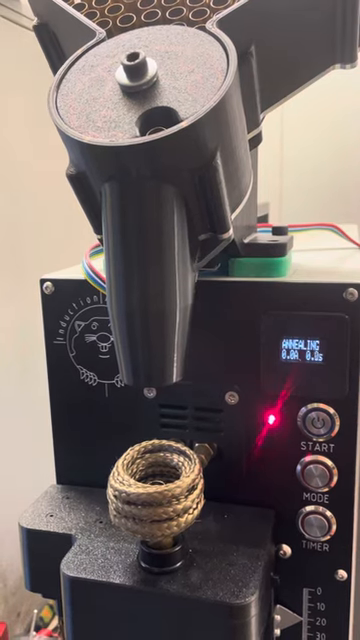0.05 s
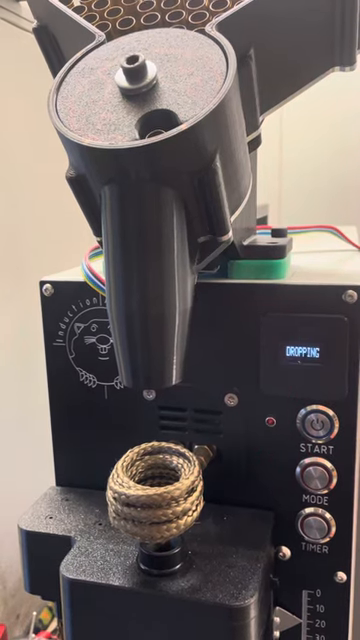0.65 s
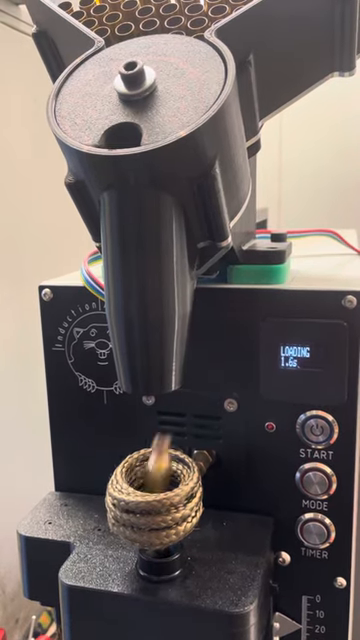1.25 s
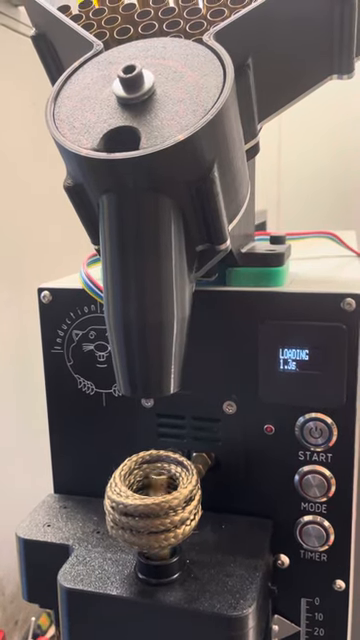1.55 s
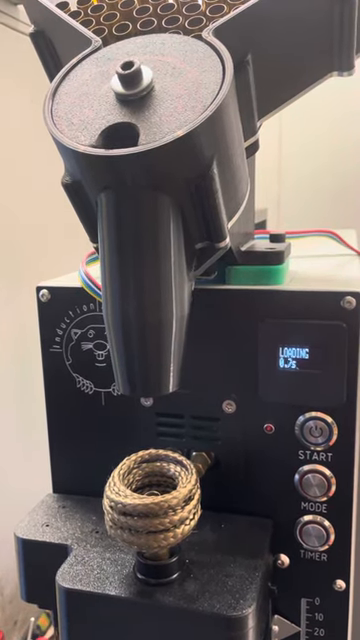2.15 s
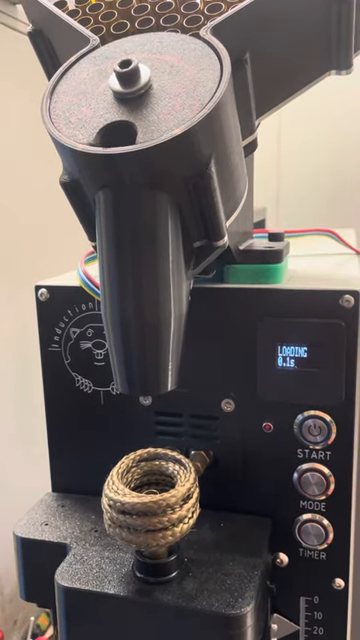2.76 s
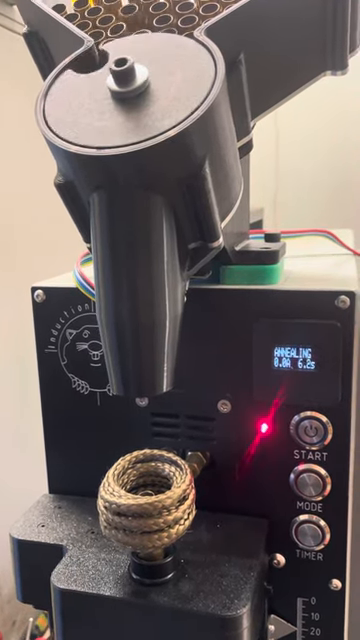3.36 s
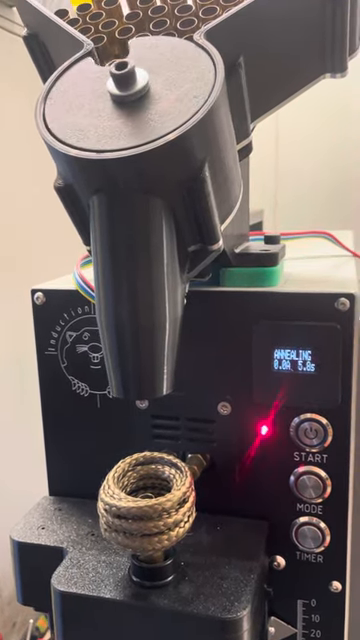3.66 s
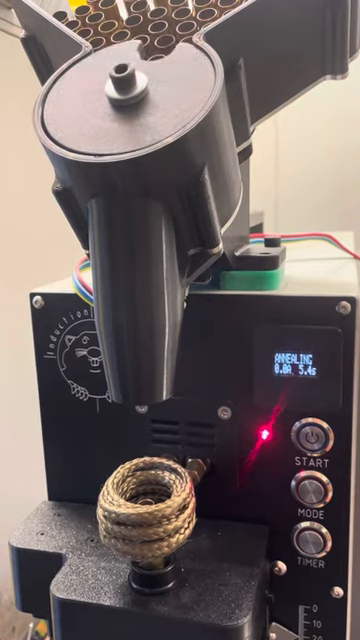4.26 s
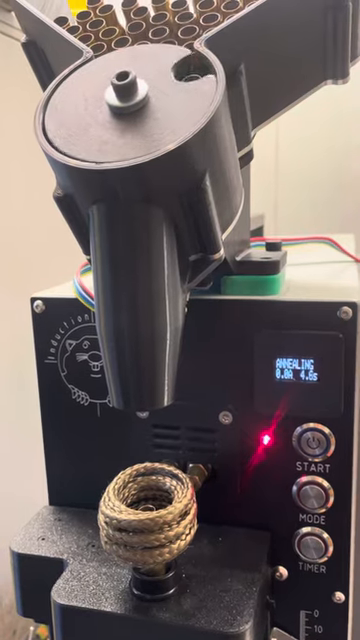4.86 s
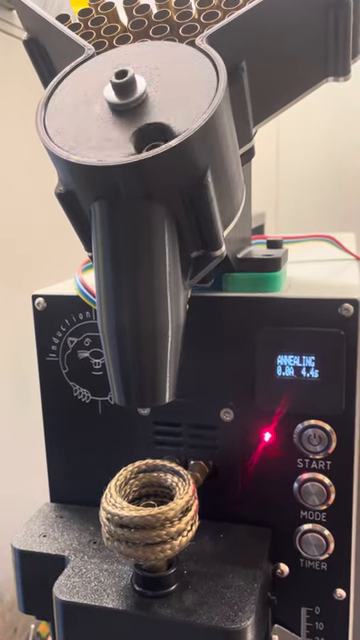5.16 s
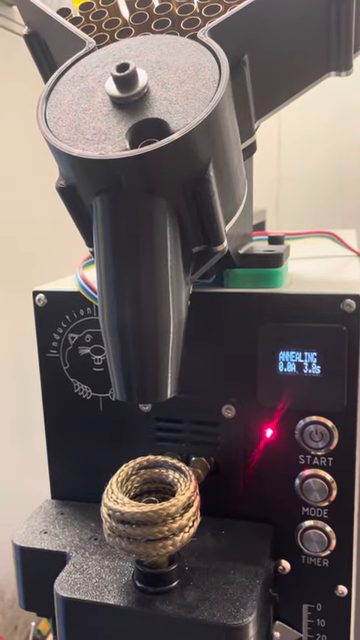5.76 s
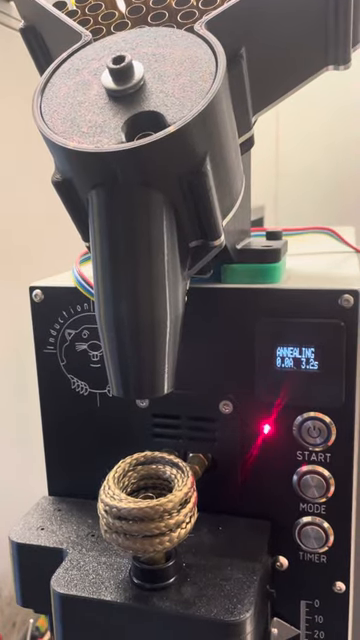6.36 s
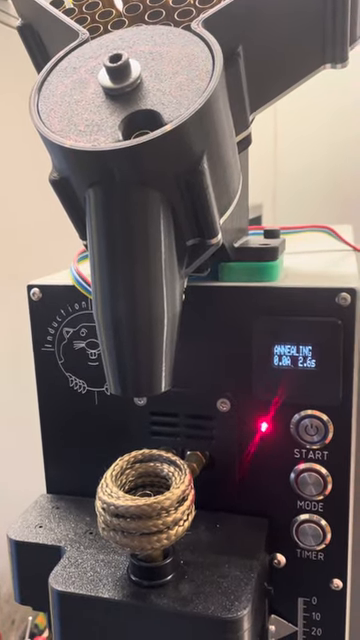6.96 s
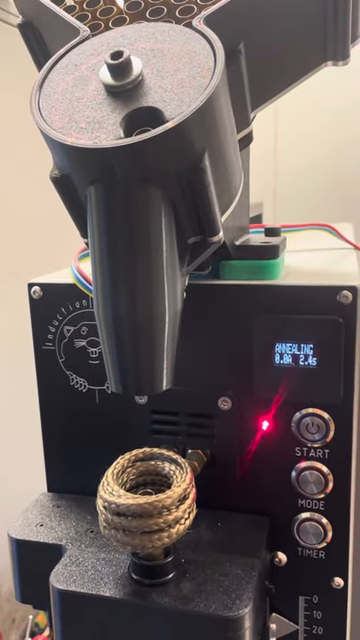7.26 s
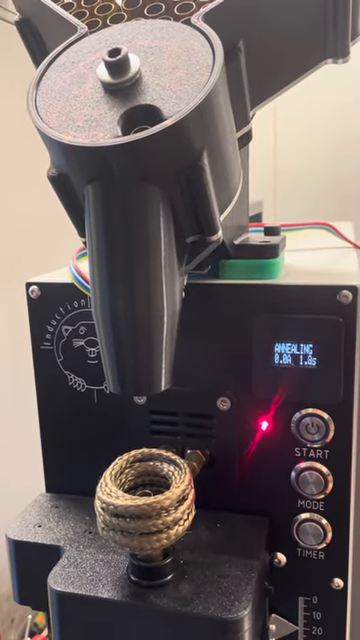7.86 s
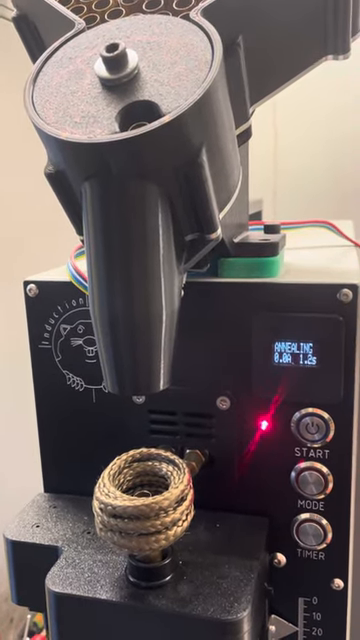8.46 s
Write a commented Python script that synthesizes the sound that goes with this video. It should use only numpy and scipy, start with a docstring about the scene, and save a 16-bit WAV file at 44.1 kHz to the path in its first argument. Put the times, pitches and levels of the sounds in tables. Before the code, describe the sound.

Two cooling fans hum and rush throughout, close by in a small workshop. At 0.15 seconds a small machine's trapdoor snaps open. A brass case rings off a chute at 0.35, knocks into the base at 0.4 and rebounds. The door claps shut with a rattle at 0.8, leaving a faint metallic ring. The next case rattles down a plastic tube at 1.0 and lands with a sharp click at 1.3, with a small tap at 1.75. Meanwhile one fan sags in pitch, then spins up from about 3.1. From 3.0 to 5.2 a motor gives a thin, high whine while a plastic feed disc rubs softly. Waiting cases clink brightly around 3.4, dry ticks cluster near 3.7, and lighter ticks patter around 5. After that only the steady fan hum continues until the end, at about 8.6 seconds.

```python
"""Two cooling fans hum in a small benchtop annealer as it swaps a brass cartridge case.
The trapdoor snaps open, the hot case rings off the chute and knocks into the base, the door claps
shut and the next case rattles down a plastic tube onto it. A whining stepper then turns the feed
disc, which rubs, ticks and jostles the cases in the hopper. Each contact is a noise crack plus
decaying modes. One fan sags while the heater is off and spins up again."""
import sys
import numpy as np
from scipy import signal
from scipy.fft import rfft, irfft, next_fast_len
from scipy.io import wavfile

SR = 44100
rng = np.random.default_rng(int(sys.argv[2]) if len(sys.argv) > 2 else 0)


def put_to_file(sound):
    """Save the sound as 16-bit audio at rate SR, in the file named by the first command-line argument."""
    columns = np.atleast_2d(sound).T  # one column per channel
    safe = np.clip(columns, -1, 1)
    whole_steps = np.round(safe * 32767)
    wavfile.write(sys.argv[1], SR, whole_steps.astype(np.int16))


N = 375291
TIME = np.arange(N) / SR
FFT_SIZE = 2 * next_fast_len(N // 2 + 1, True)
HZ = np.maximum(np.fft.rfftfreq(FFT_SIZE, 1 / SR), 1)
HEATER_OFF_S, HEATER_ON_S = 0.1, 3.07

# Crack spectrum, opening trapdoor and chute: freq_hz, level_db
SNAP_SPECTRUM = [(200, 3), (600, 3), (1100, 0.5), (2000, -3.5), (3300, -6), (5300, -4), (8500, -5.5),
                 (10500, -8), (12500, -59), (14500, -19)]
# Crack spectrum, base and closing trapdoor: freq_hz, level_db
KNOCK_SPECTRUM = [(200, -25), (450, -16.5), (830, 6.5), (1150, -1.5), (2000, -13.5), (3300, -5),
                  (5300, -4.5), (8500, -3), (10500, -9.5), (12500, -46), (14500, -32)]
# Closing trapdoor's contacts: start_s, level_db, low_modes_db
CLOSING_HITS = [(.8011, -8.5, -0.5), (.8138, -7.5, -15), (.8203, -12.5, -7), (.826, -15, -5),
                (.8325, -10.5, -14), (.883, -27, 1), (.9223, -19, -11), (.9655, -33, 6)]
# Stepper moves, fast, slow, fast: start_s, end_s, whine_db, whistle_db, rubbing_db
STEPPER_MOVES = [(3.007, 3.378, -59, -57, -53), (3.347, 4.887, -69, -61.5, -55),
                 (4.866, 5.235, -64, -55, -50)]


def from_db(db):
    """Decibels to gain."""
    return 10 ** (np.asarray(db) / 20)


def unit_rms(x):
    """Scale to unit rms."""
    return x / np.sqrt(np.mean(x ** 2) + 1e-20)


def add(track, start, sound):
    """Mix a sound in at a start sample."""
    track[start:start + len(sound)] += sound[:N - start]


def held(start_s, end_s, attack_s, release_s):
    """Trapezoid envelope, back at 0 by end_s."""
    return np.clip(np.minimum((TIME - start_s) / attack_s, (end_s - TIME) / release_s), 0, 1)


def at_hz(rows, hz):
    """Table columns interpolated over log frequency."""
    points_hz, *columns = np.transpose(rows)
    return [np.interp(np.log(hz), np.log(points_hz), column) for column in columns]


def noise(gain):
    """Noise with a given gain per frequency."""
    return irfft(rfft(rng.standard_normal(FFT_SIZE)) * gain)[:N]


def coloured(x, spectrum, size=512):
    """Unit-energy minimum-phase filter with the given spectrum."""
    db, = at_hz(spectrum, np.maximum(np.fft.rfftfreq(size, 1 / SR), 1))
    cepstrum = irfft(np.log(from_db(db)))
    cepstrum[1:size // 2] *= 2
    cepstrum[size // 2 + 1:] = 0
    response = irfft(np.exp(rfft(cepstrum)))
    return signal.oaconvolve(x, response / np.linalg.norm(response))[:N]


def wavering_tone(cycles, waver_db=4.0, waver_hz=8, wander_rad=0.52):
    """Sine with randomly drifting level and phase."""
    level, phase = [unit_rms(noise(np.exp(-HZ / waver_hz))) for _ in range(2)]
    return np.sqrt(2) * from_db(waver_db * level) * np.sin(2 * np.pi * cycles + wander_rad * phase)


def ring(hz, t60_s, build_cycles=0.39):
    """One mode: fast build-up, exponential decay."""
    age_s = np.arange(int(t60_s * SR)) / SR
    onset = 1 - np.exp(-age_s * hz / build_cycles)
    return np.sin(2 * np.pi * hz * age_s) * from_db(-60 * age_s / t60_s) * onset


def struck(hits, modes, spectrum, crack_db, crack_t60_s, crack_room_db, ring_room_db,
           detune=0.0, low_below_hz=1900, scatter_db=0.0, attack_s=0.00057):
    """Each contact cracks and rings the part's modes. Returns [direct, room send]."""
    age_s = np.arange(4000) / SR
    envelope = (1 - np.exp(-age_s / attack_s)) * from_db(crack_db - 60 * age_s / crack_t60_s)
    cracks, rings = np.zeros(N), np.zeros(N)
    for start_s, level_db, low_modes_db in hits:
        start = round(start_s * SR)
        add(cracks, start, from_db(level_db) * envelope * rng.standard_normal(len(age_s)))
        for hz, mode_db, t60_s in modes:
            louder, higher = rng.standard_normal(2)  # contact point varies
            gain = from_db(level_db + mode_db + scatter_db * louder + low_modes_db * (hz < low_below_hz))
            add(rings, start, gain * ring(hz * (1 + detune * higher), t60_s))
    cracks = coloured(cracks, spectrum)
    return np.array([cracks + rings, from_db(crack_room_db) * cracks + from_db(ring_room_db) * rings])


def settling(hits, loss_db, duller_db, lag_s=0.0036):
    """Each blow lands on an edge, then flat with its low modes reweighted."""
    contacts = []
    for start_s, level_db, low_modes_db in hits:
        contacts.append((start_s, level_db, low_modes_db))
        contacts.append((start_s + lag_s, level_db - loss_db, low_modes_db + duller_db))
    return contacts


def rattle(start_s, end_s, count, level_db, edge_drop_db, low_modes_db, spread_db=4.5):
    """Unevenly spaced contacts that swell and fade."""
    places = (np.arange(count) + rng.random(count)) / count
    levels_db = level_db - edge_drop_db * (2 * places - 1) ** 2 + spread_db * rng.standard_normal(count)
    return [(start_s + place * (end_s - start_s), db, low_modes_db)
            for place, db in zip(places, levels_db)]


def idleness(lag_s=0.42):
    """Fan state lagging the heater: 0 at full speed, 1 at idle."""
    since_off, since_on = [np.maximum(TIME - s, 0) for s in (HEATER_OFF_S, HEATER_ON_S)]
    return np.exp(-since_on / lag_s) - np.exp(-since_off / lag_s)


def fan_air(ripple_db=3.0, echo_s=0.0048, dip_db=-25, dip_below_hz=520, idle_db=-1.87):
    """Rushing air with narrow hums, softer at idle; the bass dips briefly."""
    # Air rush: freq_hz, density_db_per_hz
    rush = [(22, -93), (42, -67.5), (100, -75), (135, -74.5), (175, -59.5), (310, -67), (420, -73.5),
            (600, -68.5), (780, -71.5), (1100, -80.5), (1600, -80.5), (2400, -89), (6000, -96), (9300, -96),
            (11000, -109), (12500, -134)]
    # Fan and cabinet hums: pitch_hz, width_hz, level_db
    hums = [(54.1, 10, -41.5), (158.1, 3.1, -48.5), (203.8, 6.5, -41), (229.4, 6.9, -41.5),
            (269, 18, -48.5), (359, 9, -58.5), (405.5, 10, -55), (467.2, 8.5, -51), (526, 41, -49.5),
            (658, 35, -47.5), (1012, 45, -51.5), (1158, 25, -58), (1436.4, 32, -53.5), (2070, 130, -81),
            (2930, 77, -64.5), (5700, 370, -62)]
    rush_db, = at_hz(rush, HZ)
    # Bench and wall reflections ripple the spectrum
    reflections = rng.standard_normal(N) * np.exp(-TIME / echo_s)
    ripple = unit_rms(rfft(reflections, FFT_SIZE).real)
    power = from_db(rush_db + ripple_db * ripple * (HZ > 300)) ** 2
    for hz, width_hz, db in hums:
        power += from_db(db) ** 2 * 2 / (np.pi * width_hz) / (1 + ((HZ - hz) / width_hz) ** 2) ** 2
    gain = np.sqrt(power * SR / 2)
    bass_share = 1 / (1 + (HZ / dip_below_hz) ** 4)
    dip = held(0.415, 0.749, attack_s=0.03, release_s=0.21)
    bass = noise(gain * np.sqrt(bass_share)) * from_db(dip_db * dip)
    treble = noise(gain * np.sqrt(1 - bass_share))
    return (bass + treble) * from_db(idle_db * idleness())


def gliding_fan(full_turns_per_s=130, idle_turns_per_s=113.6, spin_up_s=2.2):
    """Seven-bladed fan: coasts down with the heater off, sings louder as it spins up."""
    orders = (1, 7, 14, 16)  # multiples of the turning rate
    levels_db = (-60, -53.5, -71.5, -73.5)
    spin_up_boosts_db, idle_drops_db = (0, 5, 9.5, 0), (-2, 0, 12, 9)
    idle = idleness()
    effort = held(HEATER_ON_S, HEATER_ON_S + spin_up_s, attack_s=0.15, release_s=0.6)
    turns = np.cumsum(full_turns_per_s + (idle_turns_per_s - full_turns_per_s) * idle) / SR
    return sum(from_db(db + boost_db * effort - drop_db * idle) * wavering_tone(order * turns)
               for order, db, boost_db, drop_db in zip(orders, levels_db, spin_up_boosts_db, idle_drops_db))


def steady_fan(blade_hz=858, level_db=-48.3):
    """Blade tone of the constant-speed fan."""
    return from_db(level_db) * wavering_tone(blade_hz * TIME, waver_db=0.5, wander_rad=0.31)


def trapdoor_opening():
    """The trapdoor snaps open with a short, bright ring."""
    # Contacts: start_s, level_db, low_modes_db
    hits = [(.1265, -34, 2), (.153, -23, -7), (.1568, -5.5, -9.5)]
    # Trapdoor modes: pitch_hz, level_db, t60_s
    modes = [(634, -24, 0.04), (1210, -13, 0.033), (1730, -15, 0.016), (2760, -10.5, 0.026),
             (3600, -0.5, 0.015), (4820, -13, 0.016), (5180, -8, 0.017), (8350, -6.5, 0.015),
             (8770, -3.5, 0.012)]
    return struck(settling(hits, loss_db=10, duller_db=20.5), modes, SNAP_SPECTRUM, detune=0.022,
                  crack_db=-11.5, crack_t60_s=0.041, crack_room_db=-1.5, ring_room_db=-12)


def case_on_chute():
    """The hot case rings as it bounces off the chute."""
    # Bounces: start_s, level_db, low_modes_db
    hits = [(.3432, -15, 8.2), (.3605, -15, 1), (.374, -22, 7.1), (.388, -24, 7.8)]
    # Brass case modes: pitch_hz, level_db, t60_s
    modes = [(1104, -11, 0.032), (2187, -15, 0.04), (2254, -15, 0.05), (4158, -9, 0.12), (4200, -17, .09),
             (5898, -5, 0.13), (5949, -19, .07), (8550, -18, 0.036), (12160, -42, 0.11), (14200, -32, .08)]
    chatter = rattle(0.348, 0.402, count=6, level_db=-24.5, edge_drop_db=3, low_modes_db=4)
    return struck(hits + chatter, modes, SNAP_SPECTRUM, low_below_hz=2600,
                  crack_db=-6, crack_t60_s=0.045, crack_room_db=-4, ring_room_db=-19)


def case_on_base():
    """The case knocks into the base and rebounds."""
    # Knocks: start_s, level_db, low_modes_db
    hits = [(.4098, -7.5, -6.5), (.5275, -24.5, -21), (.5587, -13, -19), (.568, -22.5, -9), (.578, -21, -9)]
    # Base modes: pitch_hz, level_db, t60_s
    modes = [(605, -11, 0.022), (730, -13, 0.017), (860, 1.5, 0.023), (920, -13, 0.021), (1050, -24, 0.026),
             (1560, -26, 0.053), (2964, -12, 0.034), (5200, -22, 0.055), (5500, -3, 0.012),
             (9900, -13, 0.057)]
    return struck(settling(hits, loss_db=11, duller_db=19.5), modes, KNOCK_SPECTRUM,
                  crack_db=-2, crack_t60_s=0.028, crack_room_db=-1.5, ring_room_db=-8)


def trapdoor_closing():
    """The trapdoor claps shut and rattles."""
    # Trapdoor modes: pitch_hz, level_db, t60_s
    modes = [(626, -30, 0.025), (780, -5.5, 0.025), (856, -4, 0.03), (1053, -9, 0.031), (1410, -10, 0.026),
             (2730, -22.5, 0.086), (3460, -20, 0.051), (4900, -19, 0.021), (5420, -9.5, 0.019)]
    claps = settling(CLOSING_HITS, loss_db=13, duller_db=16.5)
    chatter = rattle(0.804, 0.846, count=7, level_db=-22, edge_drop_db=6, low_modes_db=-8)
    return struck(claps + chatter, modes, KNOCK_SPECTRUM, detune=0.031,
                  crack_db=-3.5, crack_t60_s=0.044, crack_room_db=-6, ring_room_db=-5)


def trapdoor_after_ring():
    """Faint metal overtones outlast the door's first clap."""
    # Overtones: pitch_hz, level_db, t60_s
    modes = [(2713, -42, .3), (3164, -37, 1.2), (3257, -39, .25), (3395, -38, .5), (4134, -42, .45),
             (5351, -35, .35)]
    clap_s = CLOSING_HITS[0][0]
    track = np.zeros(N)
    for hz, db, t60_s in modes:
        add(track, round(clap_s * SR), from_db(db) * ring(hz, t60_s, build_cycles=1))
    return track


def case_in_tube():
    """The next case rattles down the plastic tube."""
    # Contacts: start_s, level_db, low_modes_db
    hits = [(1.0037, -14, -14), (1.0205, -16.5, -15), (1.0296, -6.5, 3.5), (1.0372, -7.5, 6),
            (1.0545, -13, -16), (1.0665, -16, -3)]
    # Tube modes: pitch_hz, level_db, t60_s
    modes = [(146.7, -36, 0.7), (1254, -9.5, 0.024), (1360, -8, 0.035), (1505, -20, 0.1), (2570, -21, .025),
             (3360, -24, 0.018), (4380, -19, 0.075), (5700, -13, 0.037), (8500, -22, .04),
             (10100, -31, 0.26), (14600, -41, 0.34)]
    # Crack: freq_hz, level_db
    spectrum = [(200, -23), (600, -13), (1100, -5), (2000, -10), (3300, -9), (5300, -12), (8500, -3.5),
                (10500, -13), (12500, -39), (14500, -39)]
    knocks = settling(hits, loss_db=19, duller_db=-10)
    chatter = rattle(1.038, 1.082, count=7, level_db=-25, edge_drop_db=4, low_modes_db=-4)
    return struck(knocks + chatter, modes, spectrum, detune=0.0061,
                  crack_db=1.5, crack_t60_s=0.014, crack_room_db=-10, ring_room_db=-9)


def case_on_trapdoor():
    """The new case lands on the shut trapdoor."""
    # Contacts: start_s, level_db, low_modes_db
    hits = [(1.2908, -2.5, -4), (1.362, -27, -4), (1.369, -21.5, 3), (1.7505, -27.5, 13)]
    # Landing modes: pitch_hz, level_db, t60_s
    modes = [(625, -14, 0.034), (1060, -5.5, 0.014), (1860, -15, 0.015), (2060, -26, .02),
             (3700, -8, 0.018), (4430, -24, 0.022), (5330, -13, 0.018), (5570, -11, 0.029),
             (9560, -30, 0.018)]
    # Crack: freq_hz, level_db
    spectrum = [(200, -17), (600, 0), (1100, -15), (2500, -7.5), (4400, 2), (5400, 0.5), (7000, 2.5),
                (7600, -7), (9600, 4), (10800, -18), (12500, -57), (14500, -25)]
    return struck(settling(hits, loss_db=15.5, duller_db=10), modes, spectrum, detune=0.014,
                  crack_db=-2.5, crack_t60_s=0.017, crack_room_db=-6, ring_room_db=-8)


def stepper_whine(pitch_hz=2000.5, fade_s=0.053):
    """Unsteady motor tone an octave under the drive's whistle, loudest in the fast moves."""
    level = sum(from_db(db) * held(start_s, end_s, fade_s, fade_s)
                for start_s, end_s, db, _, _ in STEPPER_MOVES)
    return level * wavering_tone(pitch_hz * TIME, waver_db=3, waver_hz=40, wander_rad=0.5)


def drive_whistle(pitch_hz=4001, left_lead_rad=-2.7, balance_db=-3.5, fade_s=0.029):
    """Thin tone of the stepper drive during each move, left and right nearly in antiphase."""
    tone = np.sqrt(2) * np.sin(2 * np.pi * pitch_hz * TIME + np.array([[left_lead_rad], [0]]))
    level = sum(from_db(db) * held(start_s, end_s, fade_s, fade_s)
                for start_s, end_s, _, db, _ in STEPPER_MOVES)
    return tone * level * from_db([[balance_db / 2], [-balance_db / 2]])


def disc_rubbing(slips_per_s=500, spread_db=3.5, fade_s=0.04):
    """Tiny slips of the moving printed disc against its housing."""
    # Friction: freq_hz, level_db
    spectrum = [(500, -7), (1250, 1), (1700, -11), (2400, -32), (3150, -3.5), (3800, -11), (5200, -15.5),
                (9000, -10.5), (12500, -31)]
    slips = (rng.random(N) < slips_per_s / SR) * rng.choice([-1, 1], N)
    strength = from_db(-spread_db * np.clip(rng.standard_normal(N), -2, 2))
    pressure = sum(from_db(db) * held(start_s, end_s, fade_s, fade_s)
                   for start_s, end_s, _, _, db in STEPPER_MOVES)
    return unit_rms(coloured(slips * strength, spectrum)) * pressure


def disc_ticks():
    """The feed disc touches at a new spot each time, scattering pitch and strength."""
    # Contacts: start_s, level_db, low_modes_db
    hits = [(3.1031, -32, -1), (3.655, -29, 11.5), (3.6675, -21, 0), (3.689, -31, 8), (3.7761, -31, 8.5),
            (4.029, -27.5, 2), (4.1233, -29, -3), (4.973, -29.5, 8), (5.0058, -28, -6), (5.0265, -33, -4),
            (5.038, -36, 0), (5.0675, -33.5, 9), (5.095, -32, 7), (5.131, -32, 3), (5.156, -35, -2),
            (5.2283, -24.5, -1)]
    # Disc modes: pitch_hz, level_db, t60_s
    modes = [(1400, -5.5, 0.011), (1850, -13, 0.015), (3174, -8.5, 0.021), (4900, -10, 0.009),
             (6040, -8, 0.0059), (9000, -16, 0.012)]
    # Crack: freq_hz, level_db
    spectrum = [(200, -10), (600, 3), (1500, -21), (3000, -23), (5300, -1), (9500, -11), (12000, -55),
                (14500, -34)]
    scuff = rattle(3.572, 3.612, count=6, level_db=-41, edge_drop_db=3, low_modes_db=13)
    ticks = rattle(4.9, 5.18, count=16, level_db=-36, edge_drop_db=4, low_modes_db=7)
    return struck(hits + scuff + ticks, modes, spectrum, detune=0.055, scatter_db=3,
                  crack_db=-5.5, crack_t60_s=0.012, crack_room_db=-29, ring_room_db=-3)


def cases_in_hopper():
    """Waiting cases clink as the disc jostles them."""
    # Clinks: start_s, level_db, low_modes_db
    hits = [(3.339, -42, -10), (3.3525, -29, -6), (3.3695, -24, 4), (3.375, -19.5, -3), (3.3825, -23, -3),
            (3.3895, -25, 0), (3.3935, -18, -10), (3.4065, -22, 2), (3.412, -19, 2), (3.4195, -29, 2),
            (3.437, -36, -5), (3.7761, -42, -2), (3.8888, -32, -10), (4.029, -43, 6), (4.1233, -43, 2)]
    # Modes of the cases: pitch_hz, level_db, t60_s
    modes = [(1250, -15, 0.047), (1570, -10.5, 0.026), (1780, -31, 0.017), (9620, -26, 0.09),
             (9850, -15, 0.22), (9950, 0, 0.12), (10160, -20, 0.17), (12900, -12, 0.07), (14750, -18, .07),
             (15000, -7, 0.062)]
    # Crack: freq_hz, level_db
    spectrum = [(200, -35), (600, 1), (1500, 1), (2200, -3.5), (3200, 1), (5300, -2.5), (7600, -2.5),
                (9000, 3), (11500, -36), (14000, -9)]
    jostle = rattle(3.364, 3.44, count=6, level_db=-28.5, edge_drop_db=5, low_modes_db=2)
    return struck(hits + jostle, modes, spectrum, detune=0.00325,
                  crack_db=-4, crack_t60_s=0.048, crack_room_db=-9, ring_room_db=-17)


def case_on_rim():
    """A case catches on the rim of the disc's hole: dry, tight ticks."""
    # Catches: start_s, level_db, low_modes_db
    hits = [(3.3528, -15, -11), (3.6399, -17.5, 3), (3.6525, -20, 0), (3.663, -19.5, -15),
            (3.6735, -23, -6), (3.6855, -21, -17), (3.713, -41, 8), (3.8888, -40.5, 10), (4.106, -33, 8.5),
            (4.937, -32.5, 0), (4.961, -38, -6), (4.975, -43, 10)]
    # Rim modes: pitch_hz, level_db, t60_s
    modes = [(3050, -7, 0.012), (3230, -2.5, 0.015), (4700, -14, .01), (9200, -9.5, 0.0067)]
    # Crack: freq_hz, level_db
    spectrum = [(200, 0), (1500, -14), (3200, -16), (3800, -26), (4800, -5), (7600, 1), (9000, 2),
                (11000, -15), (12500, -43), (14500, -24)]
    return struck(hits, modes, spectrum, detune=0.021, low_below_hz=4000,
                  crack_db=-4.5, crack_t60_s=0.011, crack_room_db=-4, ring_room_db=-11)


def room(x, t60_s=0.26, band_hz=(500, 9000), build_s=0.0033):
    """One diffuse tail of the small workshop."""
    age_s = np.arange(22000) / SR
    envelope = from_db(-60 * age_s / t60_s) * (1 - np.exp(-age_s / build_s))
    tail = rng.standard_normal(len(age_s)) * envelope
    bandpass = signal.butter(1, band_hz, "band", fs=SR, output="sos")
    return signal.oaconvolve(x, signal.sosfilt(bandpass, tail / np.linalg.norm(tail)))[:N]


def microphone(direct, diffuse, other_diffuse):
    """Two ports: direct sound differs in phase and level, diffuse sound is only partly shared."""
    # Left port against right: freq_hz, lead_rad, balance_db, diffuse_coherence
    ports = [(60, 0, -.4, .99), (200, -.3, -1.4, .99), (300, -.35, -2, .92), (420, -1.1, -3, .8),
             (620, -1.7, -8, .65), (850, -2.3, -6, .6), (1100, -1.8, -3.5, .5), (1400, -.2, -5, .3),
             (1900, .3, -2, .35), (2400, 1.5, -1.5, .3), (3000, 1.8, 0, .7), (5000, 1.2, 0, .4),
             (6000, 1.3, 0, .65), (7000, 2.9, 0, .8), (8500, 3.9, 0, .8), (10000, 5.2, 0, .8),
             (11200, 6, 0, .9), (13000, 3.7, 0, .9)]
    lead_rad, balance_db, coherence = at_hz(ports, HZ)
    shared = rfft(direct, FFT_SIZE) + np.sqrt((1 + coherence) / 2) * rfft(diffuse, FFT_SIZE)
    apart = np.sqrt((1 - coherence) / 2) * rfft(other_diffuse, FFT_SIZE)
    lean = from_db(balance_db / 2) * np.exp(0.5j * lead_rad)
    rms_gain = np.sqrt((abs(lean) ** 2 + abs(lean) ** -2) / 2)
    return irfft(np.array([(shared + apart) * lean, (shared - apart) / lean]) / rms_gain)[:, :N]


def scene():
    """Contacts, feed drive, fans and room in stereo."""
    case_out = trapdoor_opening() + case_on_chute() + case_on_base()
    case_in = trapdoor_closing() + case_in_tube() + case_on_trapdoor()
    feed = disc_ticks() + cases_in_hopper() + case_on_rim()
    contacts, room_send = case_out + case_in + feed
    direct = contacts + trapdoor_after_ring() + disc_rubbing() + stepper_whine()
    direct += gliding_fan() + steady_fan()
    diffuse_pair = [room(room_send) + fan_air() for _ in range(2)]
    return microphone(direct, *diffuse_pair) + drive_whistle()


def record(dry, cutoff_hz=15400):
    """Soft clip, then a steep low-pass."""
    lowpass = signal.ellip(10, 0.1, 80, cutoff_hz, fs=SR, output="sos")
    return signal.sosfilt(lowpass, np.tanh(dry))


dry = scene()
out = record(dry)
put_to_file(out)
```